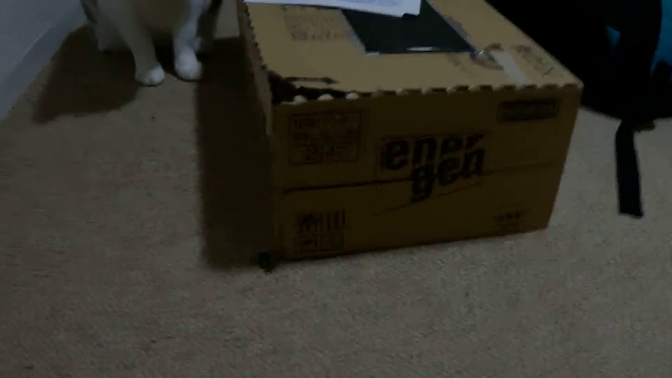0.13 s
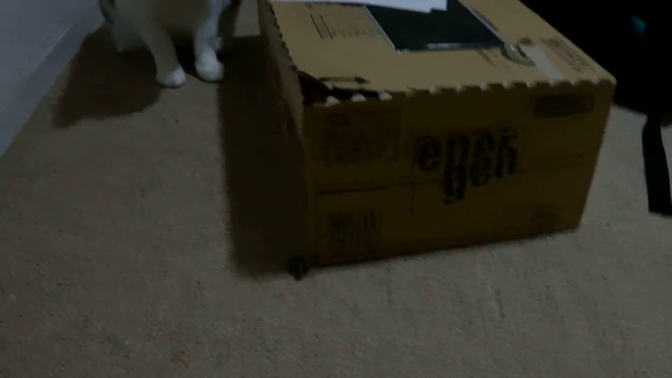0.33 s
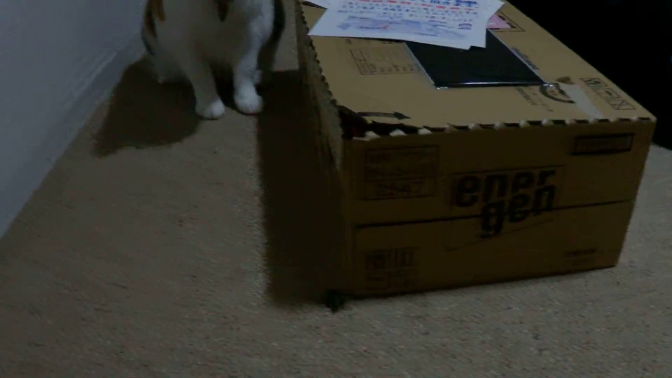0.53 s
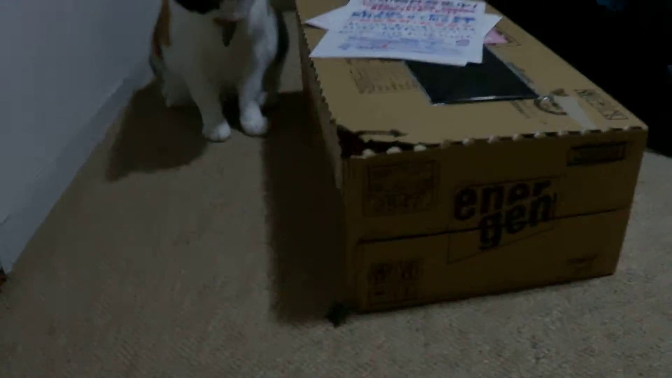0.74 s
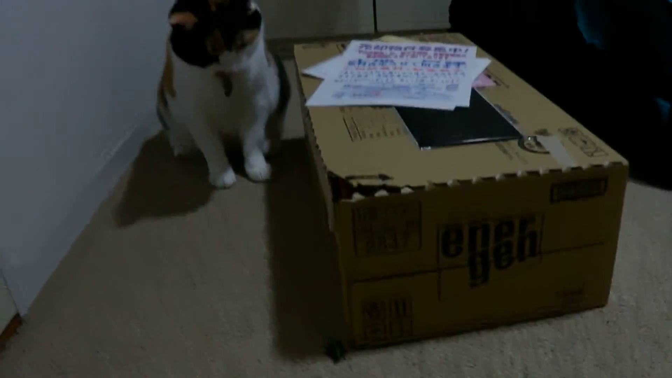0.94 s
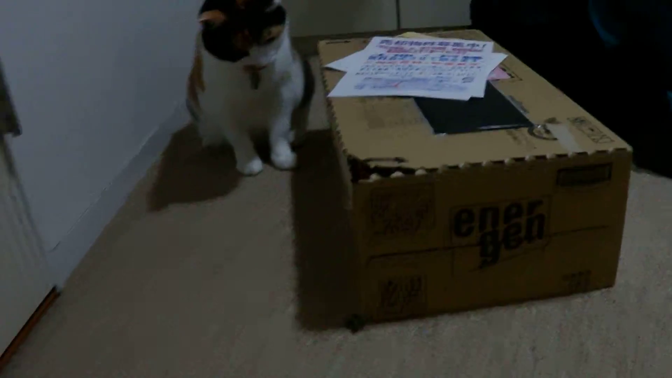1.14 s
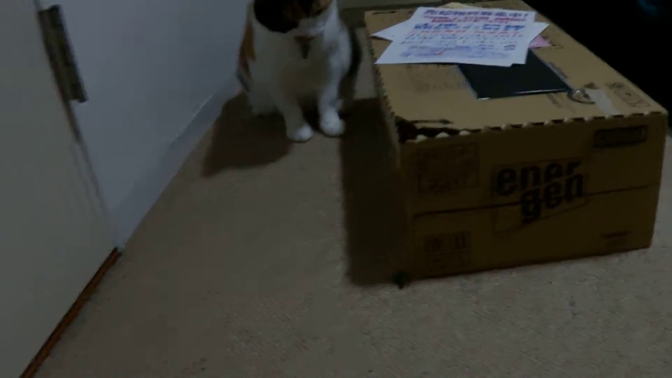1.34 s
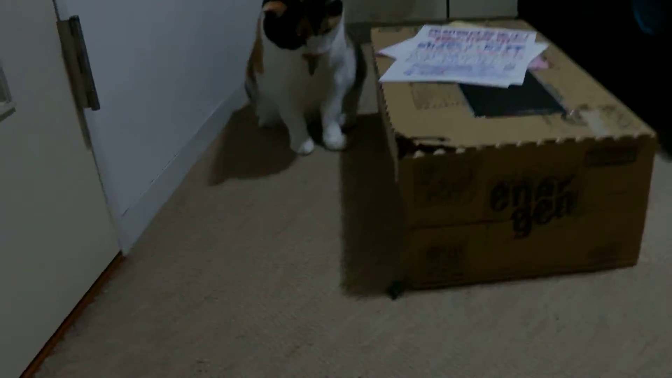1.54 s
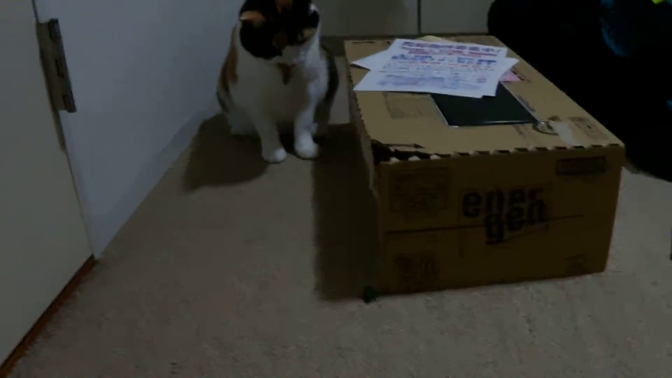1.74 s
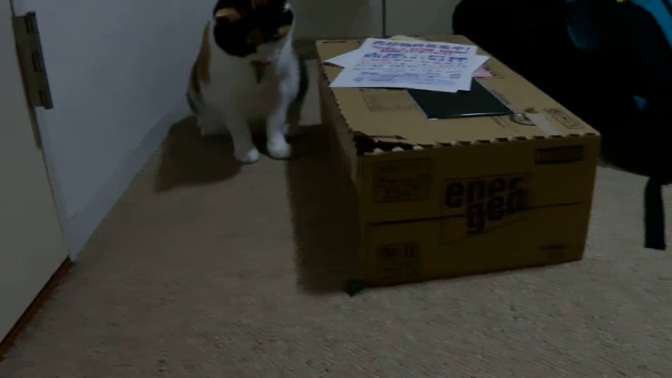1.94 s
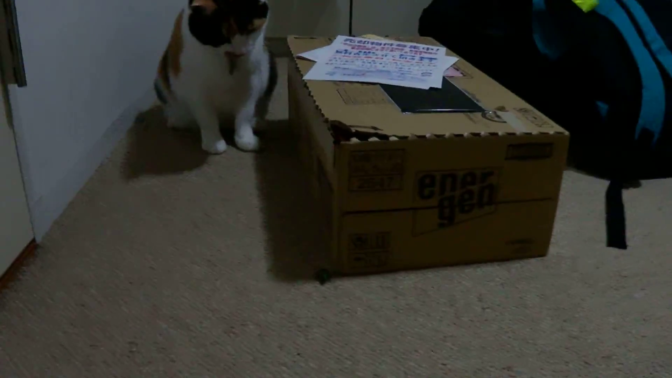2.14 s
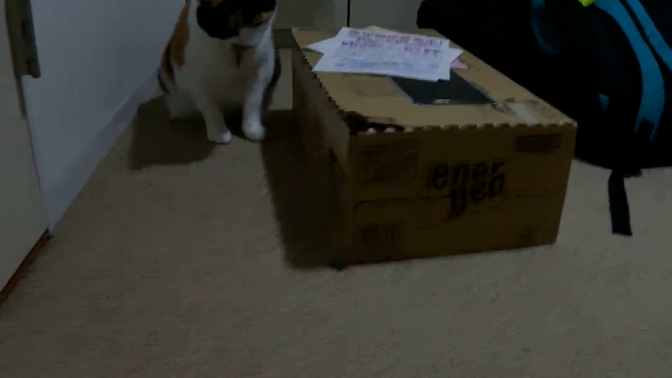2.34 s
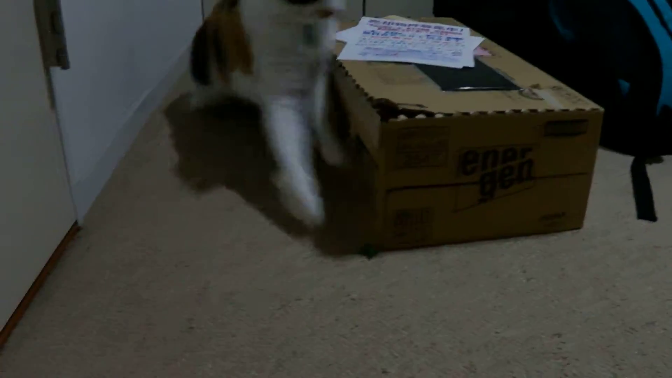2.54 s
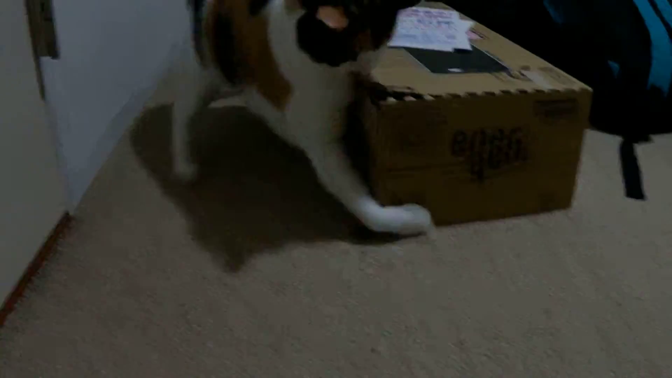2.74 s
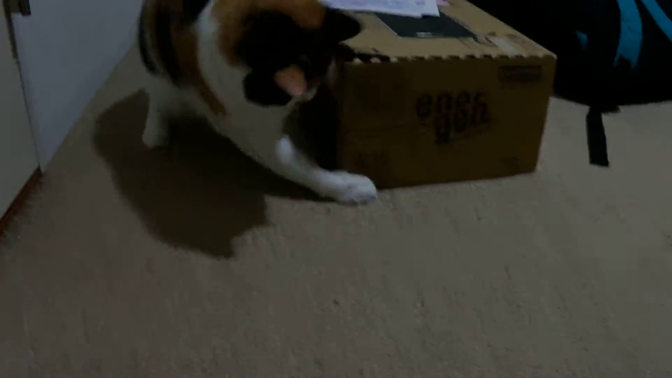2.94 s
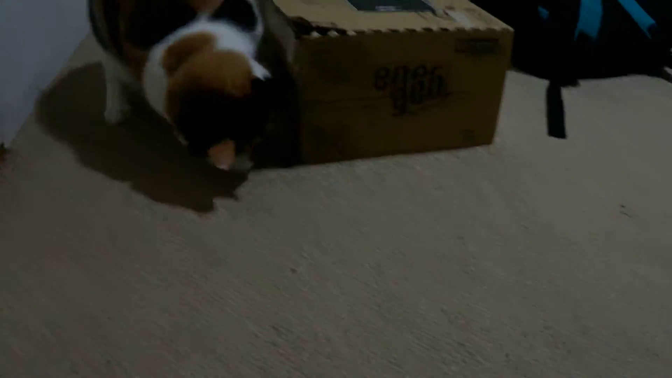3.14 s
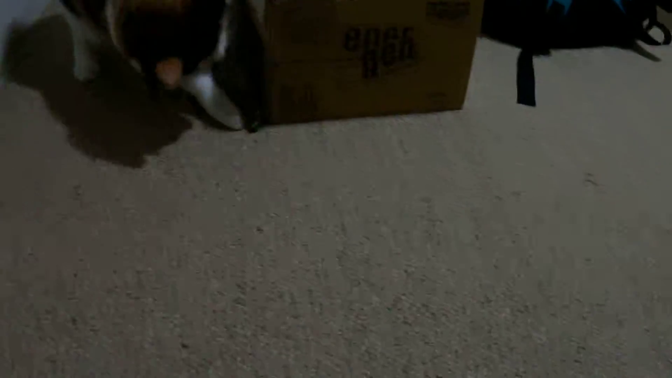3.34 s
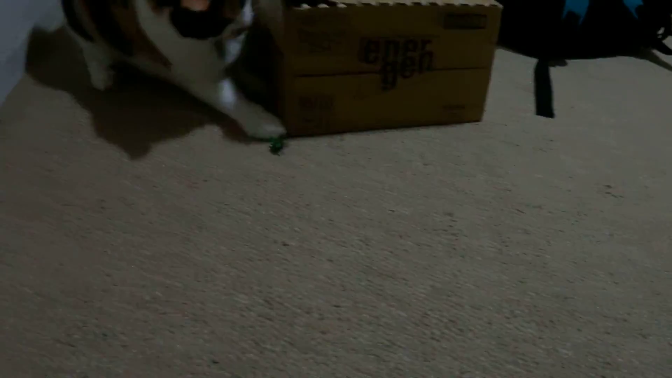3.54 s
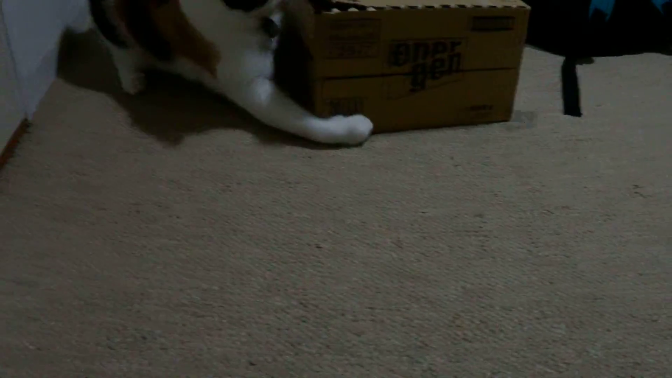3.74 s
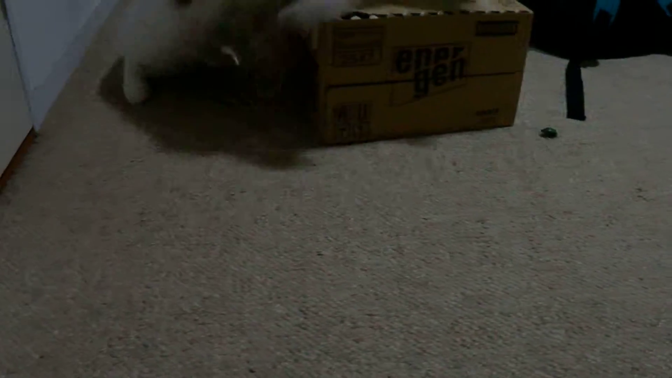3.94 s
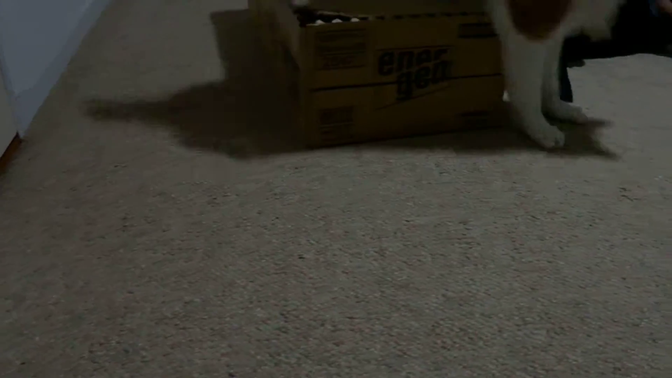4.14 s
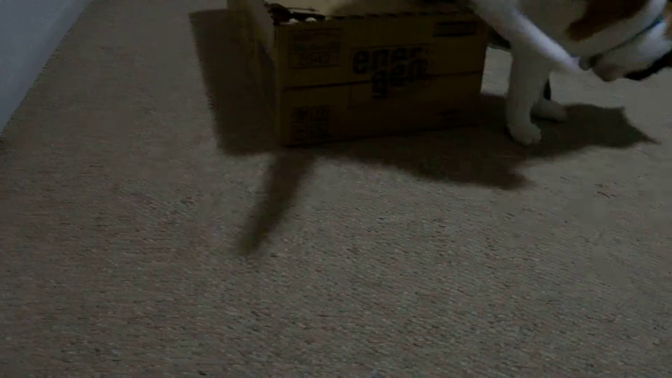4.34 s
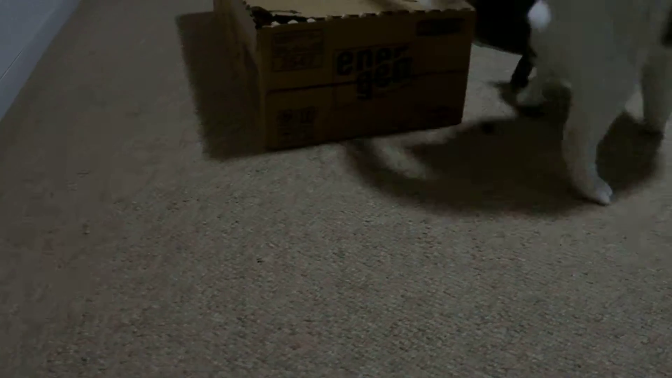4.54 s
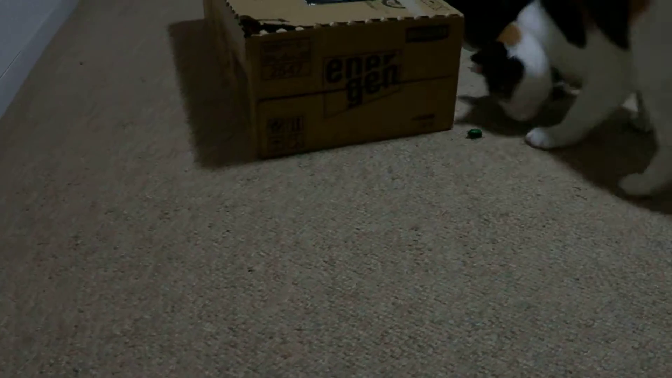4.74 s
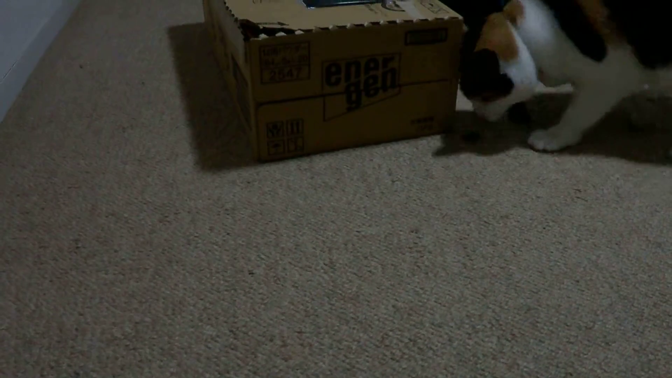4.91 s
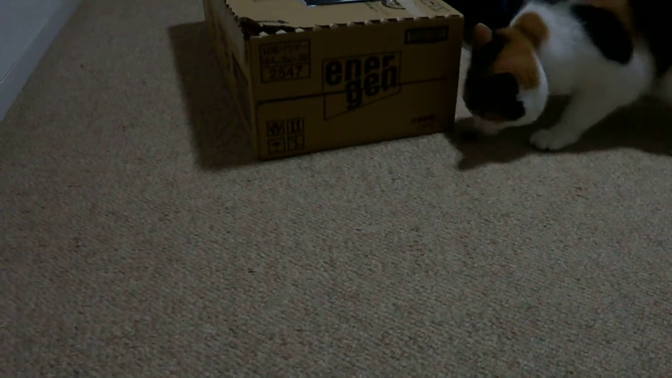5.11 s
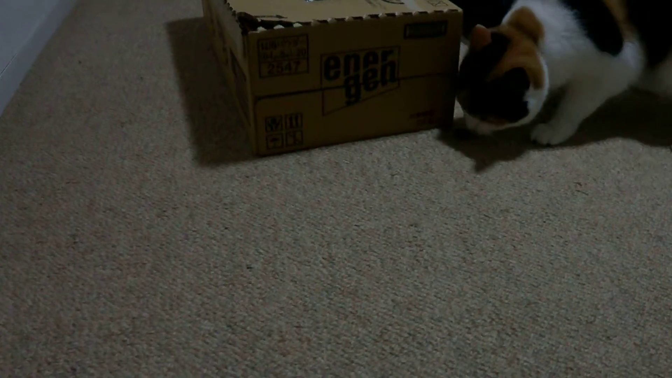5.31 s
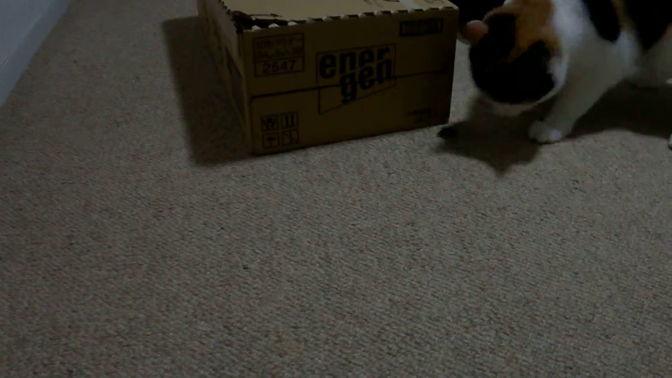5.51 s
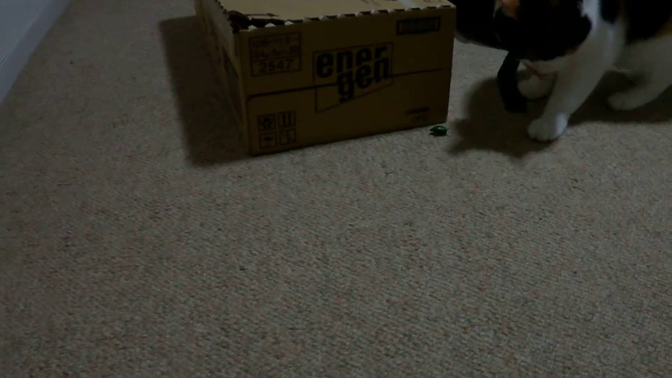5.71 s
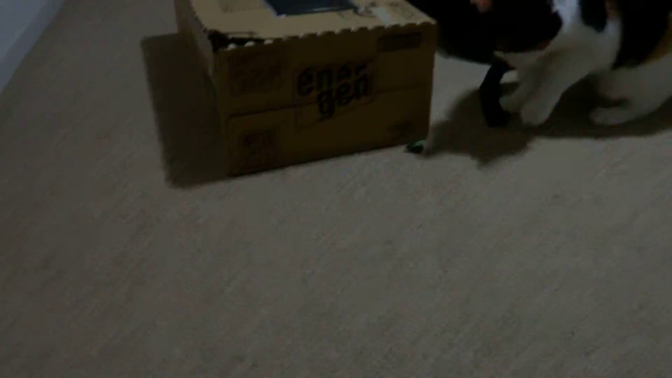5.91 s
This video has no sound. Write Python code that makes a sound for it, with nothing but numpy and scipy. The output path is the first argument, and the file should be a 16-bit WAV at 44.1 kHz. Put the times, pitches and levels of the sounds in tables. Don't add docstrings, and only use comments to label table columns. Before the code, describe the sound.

Close handheld stereo pickup of a cat playing on carpet beside a cardboard box. Near-quiet with fur rustle and faint taps gives way to a dense scramble of dull thuds, boxy knocks and crisp claw ticks. After a pause comes the loudest hollow whack, then scrabbling, a faint high bell rattle and bounding footfalls. It ends in small pats and near silence over room rumble and hiss, with barely any echo.

```python
import sys
import numpy as np
from scipy import signal
from scipy.fft import rfft, irfft
from scipy.io import wavfile
from scipy.ndimage import uniform_filter1d

SR = 44100
rng = np.random.default_rng(int(sys.argv[2]) if len(sys.argv) > 2 else 0)


def dump_mix(stems):
    frames = np.atleast_2d(stems).T
    limited = np.clip(frames, -1, 1)
    pcm = np.round(limited * 32767).astype(np.int16)
    wavfile.write(sys.argv[1], SR, pcm)


def convert_level_to_amplitude(level_db):
    exponent = np.asarray(level_db, float) / 20
    return 10 ** exponent


N = 267510
TIME = np.arange(N) / SR

# pitch_hz, level_db
QUIET_TONE = [(12, -25), (20, -6), (87, -0.5), (220, -5), (416, -14), (700, -18.5), (1200, -28),
              (2600, -37), (3700, -45.5), (4600, -39), (5600, -39.5), (7200, -31.5), (11000, -26),
              (15500, -24)]
# pitch_hz, side_minus_mid_db
QUIET_WIDTH = [(25, -8), (60, -6), (200, -2.5), (500, -1.5), (1200, -3.5), (4000, 2.5), (15000, 0)]
# pitch_hz, rms_db
SCREEN_WHINE = [(15735, -79)]
QUIET_DB = -53

# pitch_hz, level_db per Hz
PILE_TONE = [(2500, -44), (3500, -19.5), (4900, -7.5), (6600, -1.5), (8400, 2), (10000, -1.5), (12500, -11),
             (16000, -43)]
SCRAPE_TONE = [(500, 0), (900, -6), (2200, -5.5), (3500, -12.5), (5000, -12), (7000, -17.5)]
RUMBLE_TONE = [(29, -45), (50, -9), (70, -10), (91, 4.5), (162, 2), (320, -5.5), (358, -4.5), (1000, -23.5),
               (1300, -52), (2200, -120)]
# strongest_s, hiss_db, swell_s, fade_s, scrape_re_hiss_db
RUSTLES = [(.06, -61.5, 0.76, 0.17, -8), (.28, -46.5, 0.046, 0.18, -6.5), (.33, -44.5, .08, .2, -4),
           (.39, -47, 0.12, .12, -4), (.75, -55.5, 0.14, 0.33, -8), (.9, -57.5, 0.26, 0.38, 1),
           (1.05, -58.5, 0.37, 0.19, -3), (1.42, -59, 0.43, 0.22, -10), (1.54, -53, 0.15, 0.11, 1.5),
           (1.71, -51, 0.051, 0.12, 0), (2.2, -63.5, 0.27, 0.77, -2.5), (2.52, -55, 0.14, 0.16, -12),
           (2.79, -44, 0.049, .015, -12), (2.87, -48.5, .05, 0.093, -2.5), (3.31, -68, 0.9, 0.84, 4),
           (3.08, -55, .1, .2, -4), (3.18, -61, .2, .2, -6), (3.26, -56, .05, .08, 0),
           (3.4, -56, .15, .15, -6), (3.5, -50, .15, .15, -10), (3.57, -55, .2, 0.1, -6),
           (3.73, -61, 0.13, .2, 4), (3.82, -45.5, 0.15, 0.15, -5), (3.9, -44.5, 0.32, 0.3, -10.5),
           (4.14, -52, 0.053, 0.038, -4), (4.2, -51, .05, 0.14, -19), (4.44, -54.5, 0.11, 0.14, -3),
           (4.56, -51, .1, 0.24, -10), (4.79, -61, 0.68, 0.052, -2), (4.97, -53.5, 0.11, 0.12, -1)]
# strongest_s, rumble_db, swell_s, fade_s, scrape_re_rumble_db
SHOVES = [(.08, -49, .3, .3, -26), (.32, -51, 0.1, 0.23, 0), (.98, -47, 0.25, 0.25, -14),
          (2.52, -42.5, 0.094, 0.1, -14), (2.7, -25.5, 0.053, 0.066, -24), (2.815, -28, 0.05, 0.08, -16),
          (2.875, -28, 0.1, 0.1, -15), (3.0, -41, 0.02, 0.086, -4), (3.62, -48.5, 0.88, .5, -30),
          (3.795, -31, 0.13, 0.043, -13.5), (3.835, -39, 0.025, 0.062, -5.5), (3.92, -42, 0.035, 0.15, -24),
          (4.24, -28.5, 0.055, 0.1, -18), (4.36, -33, 0.02, 0.076, -9.5), (4.565, -36.5, 0.069, 0.2, -22)]
# time_s, hiss_db
FIDGET = [
    (0, -70),
    (.58, -65),
    (.8, -57.5),
    (2.4, -65.5),
    (4.6, -81),
    (5.05, -67),
    (5.3, -65),
    (5.65, -72),
    (6.07, -63),
]
# start_s, peak_db, t60_s, scrape_re_peak_db, rise_ms
SKIDS = [(1.493, -50, 0.28, -26, 3), (2.65, -29, 0.15, -17.5, 0.71), (2.68, -34.5, 0.27, -4, 5),
         (2.798, -37.5, 0.34, -6.5, 1), (2.985, -41, 0.3, -5, 1), (3.851, -35.5, 0.25, -1.5, 9),
         (3.885, -41, 0.2, 0.5, 5), (3.935, -40.5, 0.16, -13, 3.6), (4.188, -32, 0.26, -13.5, 3.9),
         (4.229, -42.5, 0.37, -2, 1), (4.341, -28, 0.21, -15.5, 2.3), (4.547, -54, 0.091, -20, 4.6),
         (4.601, -40.5, 0.07, -25, 2.9), (5.66, -58.5, 0.38, -5, 10)]
RUSTLE_RUMBLE_DB = 7
FIDGET_SCRAPE_DB, HOUSE_DB = -12, -56
RUMBLE_FLICKER_DB, RUMBLE_PAN_DB, SKID_PAN_DB = 2.4, .8, 3
STROKE_ROUND, BIGGEST_SNAP = .15, 5

# start_s, peak_db, pitch_hz, t60_s
KNOCKS = [(0.301, -50, 347.6, 0.25), (1.745, -44, 279, 0.1), (1.495, -50, 770, 0.056),
          (1.531, -48, 228, 0.2), (2.515, -48.5, 573, 0.059), (2.6719, -31, 106, .2),
          (2.6965, -31, 244, .2), (2.6987, -30, 398, .053), (2.7729, -29, 144, .2), (2.7635, -32, 520, .06),
          (2.791, -27, 200, .08), (2.803, -31, 620, .07), (2.8125, -24, 360, .1), (2.825, -27, 260, .08),
          (2.875, -35, 760, .08), (2.925, -36, 230, .15), (2.868, -27, 330, .1), (2.89, -31, 200, .12),
          (4.134, -44, 480, .08), (4.204, -31, 190, .05), (4.258, -32, 385, .14), (4.292, -37, 330, .12),
          (4.395, -36, 340, .12), (4.645, -37, 135, .15), (2.7987, -33.5, 692, 0.067), (.865, -52, 430, .1),
          (.95, -50, 450, .12), (.975, -49, 470, .1), (1.025, -45, 240, .1), (1.08, -46, 150, .08),
          (2.988, -38, 579, 0.18), (2.996, -34, 193, 0.18), (3.755, -13, 239, .135), (3.824, -32, 245, .3),
          (3.7601, -17.5, 166, .053), (3.809, -31, 400, .04), (4.141, -43, 621, 0.1),
          (4.205, -44, 600, .06), (4.24, -48, 610, .1), (4.2429, -27.5, 200, .11), (4.2513, -20, 375, .022),
          (4.3454, -25.5, 352, .14), (4.535, -52, 700, .05), (4.548, -46, 420, .06), (4.565, -46, 680, .05),
          (4.582, -44, 600, .07), (4.6, -47, 560, .08), (4.73, -44, 150, .12), (4.785, -45, 600, .05),
          (5.01, -44, 130, .1), (4.552, -44, 582, 0.11), (4.5924, -23, 136, 0.13),
          (4.762, -44.5, 514, 0.066), (4.795, -48, 510, .05), (4.963, -29, 136, 0.044)]
# start_s, peak_db, pitch_hz, t60_s
DENTS = [(2.6777, -21.5, 156, .13), (2.7615, -24.5, 161, .22), (2.8055, -22, 330, .03),
         (2.8341, -16, 197, .095), (2.8457, -15.5, 237, .12), (2.851, -25, 96, .2), (2.8462, -31, 386, .13),
         (3.7553, -17, 389, .05), (3.7562, -17, 212, .105), (4.2433, -26.5, 376, .105),
         (4.2495, -22, 153, .05), (4.3439, -26.5, 189, .115), (4.3476, -25, 228, .035)]
# start_s, peak_db, floor_tone_hz, panels_re_tone_db
STEPS = [(1.523, -36, 168, -29), (1.75, -37.5, 160, -20), (2.513, -48.5, 148, 2), (2.671, -30, 133, -8),
         (2.761, -32, 161, -4), (2.836, -40, 155.5, 8), (3.367, -42, 125, -5), (3.7035, -27, 134, -23),
         (4.134, -52.5, 155, 3), (4.189, -36.5, 102, -1), (4.212, -22.5, 118, -13), (4.244, -38, 192, 6),
         (4.549, -35, 117, -16), (4.5803, -26.5, 133, -19), (4.627, -33, 150, -20), (4.761, -35, 138, -12),
         (4.796, -37, 150, -8), (4.946, -36.5, 139, -14), (5.046, -43.5, 197, -7), (5.747, -48, 94, -4),
         (6.019, -43, 80, -26)]
# start_s, peak_db, box_tone_hz, panels_re_tone_db
SLAPS = [(2.699, -40, 246, 5), (2.797, -28, 379, 3), (2.844, -40, 232, 8), (2.869, -33, 237, -15),
         (2.984, -32, 257.5, 4), (3.737, -33, 232, 2.5), (3.7562, -30, 233.7, -4), (3.791, -50, 353, 0),
         (3.822, -45, 254, -10), (3.842, -47, 227, -25), (4.228, -32.5, 359, -27), (4.3465, -38, 357, 3),
         (4.393, -41.5, 306, 0)]
# pitch_hz, level_db, t60_s
PANELS = [(291.7, 3, 0.087), (351.4, 11.5, 0.032), (413.7, 3, 0.06), (434.2, -7.5, 0.24), (515, -15, 0.037),
          (573, -0.5, 0.058), (600, -30, 0.0073), (720, -17, 0.042), (712, -6.5, 0.045), (830, -22, 0.025),
          (980, -29, 0.018), (1092, -25, 0.096)]
FLOOR_HZ, FLOOR_T60_S, FLOOR_DB = 101.4, 0.13, -18.5
STEP_T60_S, STEP_PUSH_MS = 0.053, 4.2
SLAP_T60_S, SLAP_PUSH_MS = 0.078, 4.5
USUAL_DB, SHORTER_MS_PER_DB = -30, .15
KNOCK_PAN_DB, KNOCK_RISE_MS = 2, .3
BOTTOM_HZ, LEFT_LEAD_SAMPLES = 58, 2

# start_s, peak_db, treble_tilt_db, left_minus_right_db
CRACKS = [(0.633, -46.5, 30, -7), (2.693, -31, -12, -1), (2.7015, -27, -14, -2), (2.7045, -31, -14, -2),
          (2.7625, -44, -10, 6), (2.7989, -27, 6, 7), (2.8445, -34, -27, 0), (2.836, -38, -20, 0),
          (2.8555, -35, 0, 6), (2.9841, -23.5, -12, 3), (3.3665, -46, 0, 7), (3.627, -49, 5, 4),
          (3.821, -48, -40, 0), (4.041, -50, -10, 4), (3.7385, -56, 0, 1), (3.7557, -30, 0, 9),
          (3.7926, -30, 14, 5), (3.933, -37, -8, 2), (4.0806, -51, 9, 17), (4.148, -44, 9, 4),
          (4.229, -26.5, -14, 5), (4.233, -27, -14, -8), (4.238, -35, -14, 5), (4.2466, -35, -10, 14),
          (4.3405, -30, 8, 4), (4.559, -39.5, 15, 1), (4.7855, -51.5, -7, 0), (5.9752, -50, 18, -2)]
# pitch_hz, level_db per Hz
CLAW_TONE = [(1200, -23), (2500, -7.5), (4000, -5), (6000, 3.5), (8500, 9), (12000, 3), (16000, -26)]
CRACK_MS = 2.03

# start_s, peak_db, pitch_hz, left_minus_right_db
CHOKED = [
    (2.6523, -32, 7750, 13),
    (2.6565, -30, 7900, 11),
    (2.6575, -33, 8500, 9),
    (2.6625, -34, 8300, 9),
    (2.681, -35, 8900, 8),
]
# start_s, low_db, middle_db, high_db, left_minus_right_db
PINGS = [
    (2.778, -80, -47, -80, 2),
    (3.2525, -52, -61, -55, 12),
    (4.054, -80, -57, -80, 11),
    (4.064, -80, -56, -80, 11),
    (4.074, -80, -56, -80, 11),
    (4.08, -80, -57, -44.5, 6.1),
    (4.124, -78, -80, -55, 5),
    (4.132, -59, -80, -80, 4),
    (4.14, -57, -80, -58, 4),
    (4.147, -51, -80, -48, 6),
]
# pitch_hz, t60_s
BELL = [(7670, 0.038), (8380, .06), (13180, .045)]
CHOKED_T60_S = .026

# start_s, peak_db, pitch_hz, left_minus_right_db
TICKS = [(2.7012, -35, 1200, 1), (2.8447, -19, 950, 1.5), (2.845, -33, 2600, 1), (2.8, -39, 2400, 3),
         (2.799, -35, 4400, 5), (2.9838, -31, 1190, 2.5), (2.984, -25.5, 1490, 2), (2.9838, -31, 2380, -7),
         (2.9845, -37, 3150, -2), (2.9838, -32.5, 4250, -9), (2.985, -30.5, 5500, 7),
         (2.9842, -28.5, 6600, 6), (3.7385, -45, 1150, 0), (3.7556, -25.5, 1010, 2), (3.7558, -33, 1750, 0),
         (3.756, -35, 2800, 0), (3.756, -28.5, 2300, -5), (3.7932, -23.5, 800, -1), (3.7938, -30, 1350, 5),
         (3.7927, -22, 1820, -5), (3.7927, -33, 2430, 7), (3.7931, -33, 2100, 0), (3.7932, -33, 1050, 0),
         (4.233, -39, 2000, 0), (4.233, -41, 2550, 0), (3.7925, -40, 3800, 5), (2.998, -44, 1450, 0),
         (3.008, -44, 1700, 0), (3.7923, -41, 3100, 10), (4.231, -33, 3630, 5), (4.231, -34.5, 5120, 10),
         (4.231, -29.5, 7100, 18), (4.786, -51, 1210, 0)]
TICK_CYCLES, TICK_LEAST_S = 14, 0.01

# from_hz, t60_s, level_db
ROOM_BANDS = [(60, .3, -14), (500, .3, -10), (1100, .25, -13), (2500, .2, -15), (6000, .14, -17)]
TOP_HZ = 15790


def colour(x, points, extra=((1, 0), (2, 0))):
    f = np.log(np.fft.rfftfreq(x.shape[-1], 1 / SR) + 1)
    db = 0
    for curve in (points, extra):
        hz, level_db = np.transpose(curve)
        db = db + np.interp(f, np.log(hz), level_db)
    return irfft(rfft(x) * convert_level_to_amplitude(db), x.shape[-1])


def unit(x):
    return x / np.sqrt(np.mean(x ** 2))


def walk(rate_hz):
    hold = int(SR / rate_hz)
    levels = np.repeat(rng.standard_normal(N // hold + 1), hold)
    return 0.98 * uniform_filter1d(uniform_filter1d(levels, hold), hold)[:N]


def decay(t60_s, t):
    return np.exp(-np.log(1000) * t / t60_s)


def ring(hz, t60_s, t):
    return np.sin(2 * np.pi * hz * t) * decay(t60_s, t)


def add(out, start_s, sound, peak_db, pan_db=0.):
    i = int(start_s * SR)
    part = (sound * convert_level_to_amplitude(peak_db) / np.abs(sound).max())[:N - i]
    out[:, i:i + len(part)] += part * convert_level_to_amplitude(np.array([[pan_db], [-pan_db]]) / 2)


def rings(table, rise_ms=.01):
    out, t = np.zeros((2, N)), TIME[:SR // 4]
    for start_s, db, hz, t60_s, pan_db in table:
        rise = 1 - np.exp(-t * 1000 / rise_ms)
        add(out, start_s, ring(hz, max(t60_s, .005), t) * rise, db, pan_db)
    return out


def quiet():
    mid = colour(rng.standard_normal(N), QUIET_TONE)
    side = colour(rng.standard_normal(N), QUIET_TONE, QUIET_WIDTH)
    noise = (mid + side * np.array([[1], [-1]])) * convert_level_to_amplitude(QUIET_DB - 2) / np.sqrt(np.mean(mid ** 2))
    for hz, db in SCREEN_WHINE:
        noise = noise + convert_level_to_amplitude(db) * np.sqrt(2) * np.sin(2 * np.pi * hz * TIME)
    return noise


def fibres(points, spread_db, wide):
    size = convert_level_to_amplitude(spread_db * np.minimum(rng.exponential(size=N), BIGGEST_SNAP))
    mid = unit(colour(size * rng.standard_normal(N), points))
    side = unit(colour(size * rng.standard_normal(N), points))
    return unit(mid + wide * side * np.array([[1], [-1]]))


def strokes(table):
    own, scrape = 0, 0
    for strongest_s, db, swell_s, fade_s, scrape_db in table:
        late = TIME - strongest_s
        away = np.where(late < 0, -late / max(swell_s, .01), late / max(fade_s, .01))
        rounded = np.hypot(away, STROKE_ROUND) - STROKE_ROUND
        power = convert_level_to_amplitude(db - 2 - 20 * rounded) ** 2
        own = own + power
        scrape = scrape + power * convert_level_to_amplitude(scrape_db) ** 2
    return own, scrape


def skids():
    hiss, scrape, t = np.zeros((2, N)), np.zeros((2, N)), TIME[:SR // 2]
    for start_s, db, t60_s, scrape_db, rise_ms in SKIDS:
        fade = decay(max(t60_s, .02), t) * (1 - np.exp(-t * 1000 / max(rise_ms, .3)))
        add(hiss, start_s, fade, db - 8.5, SKID_PAN_DB)
        add(scrape, start_s, fade, db - 6.0 + scrape_db)
    stutter = convert_level_to_amplitude(2.4 * walk(300))
    return hiss * stutter, scrape * stutter


def scuffs():
    fidget = convert_level_to_amplitude(np.interp(TIME, *np.transpose(FIDGET))) ** 2
    brush, brush_scrape = strokes(RUSTLES)
    shove, shove_scrape = strokes(SHOVES)
    skid_hiss, skid_scrape = skids()
    rub = np.sqrt(brush + fidget)
    drag = np.sqrt(brush_scrape + shove_scrape + fidget * convert_level_to_amplitude(FIDGET_SCRAPE_DB) ** 2)
    weight = np.sqrt(shove + brush_scrape * convert_level_to_amplitude(RUSTLE_RUMBLE_DB) ** 2 + convert_level_to_amplitude(HOUSE_DB) ** 2)
    hiss = fibres(PILE_TONE, 1.0, 0.88) * (rub * convert_level_to_amplitude(-5.5 + 1.55 * walk(29.9)) + skid_hiss)
    scrape = fibres(SCRAPE_TONE, 2.5, 0.72) * (drag * convert_level_to_amplitude(-4.0 + 2.83 * walk(40)) + skid_scrape)
    pan_db = RUMBLE_PAN_DB * np.array([[.5], [-.5]])
    flicker = convert_level_to_amplitude(-5.0 + RUMBLE_FLICKER_DB * walk(15) + pan_db)
    rumble = fibres(RUMBLE_TONE, 2.0, 0.15) * weight * flicker
    return hiss + scrape + rumble


def knocks(table):
    return rings([(*row, KNOCK_PAN_DB) for row in table], KNOCK_RISE_MS)


def thumps(table, t60_s, usual_push_ms):
    out, t = np.zeros((2, N)), TIME[:SR // 3]
    chance = rng.standard_normal((len(table), 2, len(PANELS)))
    for (start_s, db, hz, panel_db), (size, detune) in zip(table, chance):
        push_ms = max(usual_push_ms - SHORTER_MS_PER_DB * (db - USUAL_DB), .5)
        push = (1 - np.exp(-t / (push_ms / 1000))) ** 2
        add(out, start_s, -ring(hz, max(t60_s, .02), t) * push, db, 1.1)
        floor_hz = FLOOR_HZ * (1 + 0.073 * detune[0])
        add(out, start_s, -ring(floor_hz, FLOOR_T60_S, t) * push, db + FLOOR_DB, 1.1)
        panels = 0
        for (mode_hz, mode_db, mode_t60_s), gain, shift in zip(PANELS, size, detune):
            panels = panels + gain * convert_level_to_amplitude(mode_db) * ring(mode_hz * (1 + 0.04 * shift), mode_t60_s, t)
        add(out, start_s, panels * (1 - np.exp(-t / 0.0038)), db + panel_db, .6)
    return out


def paws():
    landings = thumps(STEPS, STEP_T60_S, STEP_PUSH_MS) + thumps(SLAPS, SLAP_T60_S, SLAP_PUSH_MS)
    blows = landings + knocks(KNOCKS) - knocks(DENTS)
    low_cut = signal.butter(3, BOTTOM_HZ, "high", fs=SR, output="sos")
    blows = signal.sosfiltfilt(low_cut, blows)
    blows[1] = np.roll(blows[1], LEFT_LEAD_SAMPLES)
    return blows


def cracks():
    out, t = np.zeros((2, N)), TIME[:2048]
    fade = np.exp(-t / (CRACK_MS / 1000)) * (1 - np.exp(-t / .0001))
    for start_s, db, tilt_db, pan_db in CRACKS:
        grit = rng.standard_normal(len(t))
        scratch = colour(grit, CLAW_TONE, ((4000, 0), (13000, tilt_db)))
        add(out, start_s, scratch * fade, db, pan_db)
    return out


def bell():
    partials = [(start_s, db, hz, CHOKED_T60_S, pan_db) for start_s, db, hz, pan_db in CHOKED]
    for start_s, *levels, pan_db in PINGS:
        for db, (hz, t60_s) in zip(levels, BELL):
            partials.append((start_s, db, hz, t60_s, pan_db))
    return rings(partials)


def ticks():
    return rings([(start_s, db, hz, max(TICK_CYCLES / hz, TICK_LEAST_S), pan_db)
                  for start_s, db, hz, pan_db in TICKS])


def room(x):
    t, tail = TIME[:SR // 2], 0
    edges = [row[0] for row in ROOM_BANDS] + [16000]
    for (lo_hz, t60_s, db), hi_hz in zip(ROOM_BANDS, edges[1:]):
        mid, side = rng.standard_normal((2, len(t)))
        pair = mid + min(lo_hz / 2500, 1) * side * np.array([[1], [-1]])
        band_pass = signal.butter(2, [lo_hz, hi_hz], "band", fs=SR, output="sos")
        band = signal.sosfilt(band_pass, pair) * decay(t60_s, t) * (t > .004)
        energy = np.mean(np.sum(band ** 2, axis=1))
        tail = tail + convert_level_to_amplitude(db) * band / np.sqrt(energy / (hi_hz - lo_hz) * SR / 2)
    return signal.fftconvolve(x.mean(axis=0)[None], tail, axes=1)[:, :N]


def scene():
    hits = paws() + cracks() + bell() + ticks()
    return quiet() + scuffs() + hits + room(hits)


def band_limit(x):
    return signal.sosfilt(signal.butter(12, 16820, fs=SR, output="sos"), x)


def record(dry):
    top_cut = signal.ellip(10, .2, 70, TOP_HZ, fs=SR, output="sos")
    dull = signal.sosfilt(top_cut, dry)
    return band_limit(dull)


dry = scene()
out = record(dry)
dump_mix(out)
```